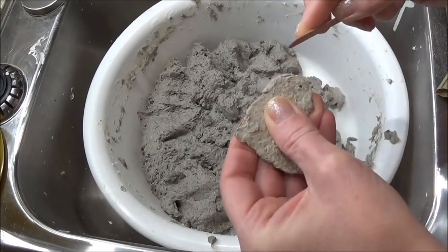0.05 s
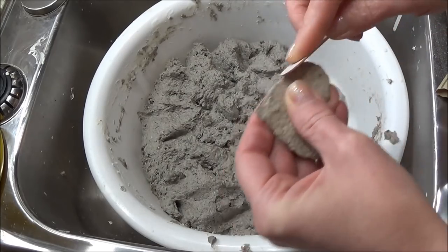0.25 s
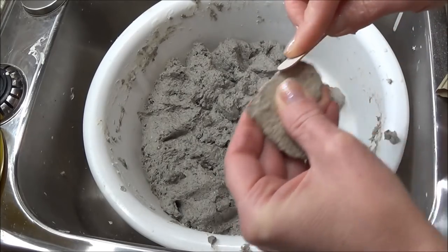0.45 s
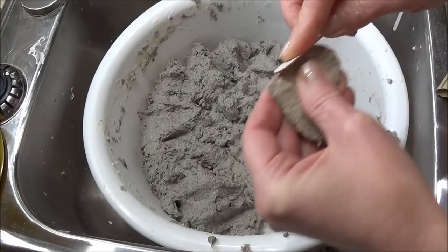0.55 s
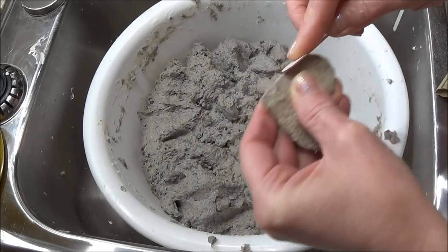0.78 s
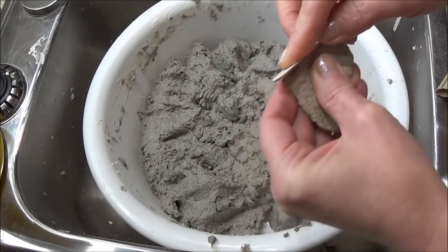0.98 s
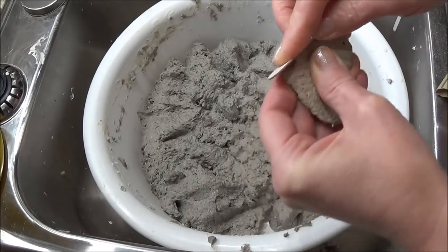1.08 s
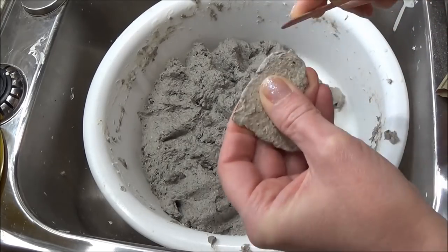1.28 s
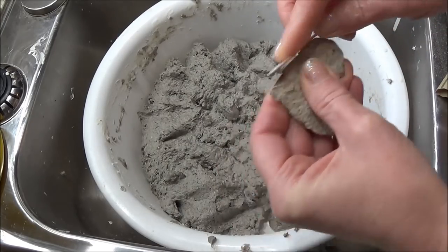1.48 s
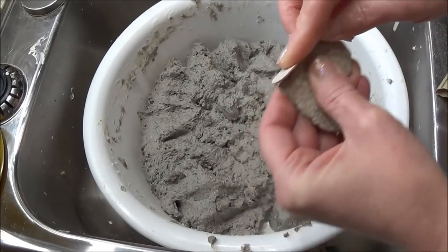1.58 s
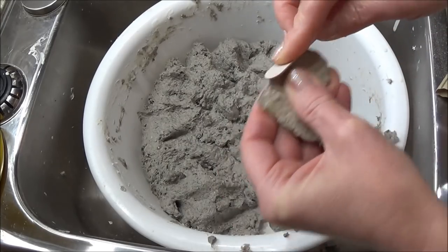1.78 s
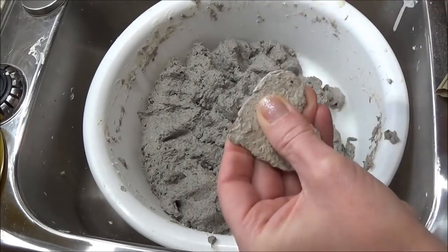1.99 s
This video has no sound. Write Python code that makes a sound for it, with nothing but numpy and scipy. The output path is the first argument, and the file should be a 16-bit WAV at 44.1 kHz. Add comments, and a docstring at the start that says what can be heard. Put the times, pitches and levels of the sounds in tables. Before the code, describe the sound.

An emery board files a lump of dried clay with quick, dry, scratchy strokes. It pauses briefly, then rasps again in a shorter burst. The sound is close, over a kitchen sink, with soft room noise and an appliance hum.

```python
"""Soft room noise and the hum of an appliance are heard from start to end.
Almost at once, an emery board is rubbed quickly to and fro over dried clay for about a second.
Grit catches and breaks thousands of times a second and rings the stiff board; each stroke swells,
then stalls at the turn. The steel sink below and the kitchen answer with brief echoes.
The board slides off, and after a short pause a second, shorter burst ends in one faint stroke."""
import sys
import numpy as np
from scipy import signal
from scipy.fft import rfft, irfft
from scipy.io import wavfile

SR = 44100
rng = np.random.default_rng(int(sys.argv[2]) if len(sys.argv) > 2 else 0)


def put_to_file(sound):
    """Save the sound as 16-bit audio at rate SR, in the file named by the first command-line argument."""
    columns = np.atleast_2d(sound).T  # one column per channel
    safe = np.clip(columns, -1, 1)
    whole_steps = np.round(safe * 32767)
    wavfile.write(sys.argv[1], SR, whole_steps.astype(np.int16))


N = 90404
TIME = np.arange(N) / SR
CUTOFF_HZ = 15750

# The strokes of the board. Each row: start in seconds, seconds up to the crest, seconds from crest to
# stall, crest level in dB, first bite against the crest in dB, brightness in dB, dull rub in dB.
STROKES = [ (.141, 0.028, .027, -32.5, 2.5, -2, 2.5), (0.2, 0.014, 0.031, -28.5, -8, 2, -4.5),
           (.251, 0.024, 0.023, -32, -7, 2, -1), (0.305, 0.02, 0.028, -29, -13, 3.5, -11),
           (.364, 0.027, 0.018, -31.5, -2, 1, 2), (.421, .020, 0.026, -31, -2, 0.5, -5),
           (.475, 0.029, 0.02, -30.5, -8, 4.5, 1.5), (0.532, 0.024, 0.025, -31, -13, 3.5, 0.5),
           (.590, 0.014, 0.031, -32.5, -7, 7, 3), (0.646, .025, 0.023, -30, -16, 2.5, -9),
           (.703, 0.021, 0.021, -32, -10.5, 3.5, 5), (.759, 0.022, 0.019, -31, -8.5, 4, -5.5),
           (0.811, .026, 0.013, -31, -9.5, 2, -1.5), (0.868, 0.022, 0.029, -33.5, -9.5, 4, 2.5),
           (.927, 0.029, 0.017, -31.5, -6, -1, 2.5), (.986, 0.019, 0.027, -32.5, -14, 4.5, -8),
           (1.042, 0.024, 0.018, -31.5, -11.5, 2.5, 1.5), (1.1, 0.021, 0.031, -29.5, -7.5, 4.5, -15),
           (1.46, 0.0089, 0.02, -29, 0.5, -1, 0), (1.514, 0.02, 0.018, -38.5, -10, -2.5, -2),
           (1.563, 0.021, 0.019, -32, -5, 0, 4.5), (1.616, 0.019, 0.03, -30.5, -14, 1, -4.5),
           (1.677, 0.021, 0.022, -32, -10.5, 4, 3), (1.734, .017, 0.028, -30, -10, 2, -2),
           (1.792, 0.023, 0.021, -30.5, -8.5, 2.5, 3.5), (1.848, 0.018, 0.031, -30.5, -2.5, 5.5, -4.5),
           (1.937, 0.012, 0.015, -55.5, -17, -2, 9.5)]
# The hollow tones of bowl and sink. Each row: pitch in Hz, width in Hz, boost in dB (minus is a dip).
HOLLOW_TONES = [(207, 28, 6.5), (315.5, 34, 5), (371.6, 67, 6.5), (672.5, 53, 7), (1250, 104, -5.5)]


def from_db(db):
    """Turns decibels into a number to multiply a sound by."""
    return 10 ** (np.asarray(db) / 20)


def rms_one(x):
    """Scales a sound to an average power of one."""
    return x / np.sqrt(np.mean(x ** 2) + 1e-20)


def passband(x, hz, kind, order=2):
    """Keeps the "low" or the "high" side of a frequency."""
    return signal.sosfilt(signal.butter(order, np.clip(hz, 10, .45 * SR), kind, fs=SR, output="sos"), x)


def colour(x, points, peaks=(), size=8192):
    """Shapes a sound with a tone curve and ringing peaks; white noise keeps about the same power."""
    hz = np.maximum(np.fft.rfftfreq(size, 1 / SR), 1)
    knots, levels = np.transpose(points)
    db = np.interp(np.log(hz), np.log(knots), levels)
    for centre, width, lift in peaks:
        db = db + lift / (1 + (2 * (hz - centre) / width) ** 2)
    gain = from_db(db) / np.sqrt(np.mean(from_db(db) ** 2 * (hz < CUTOFF_HZ)))
    # These steps make the filter ring after each hit, never before it.
    cepstrum = irfft(np.log(gain))
    cepstrum[1:size // 2] *= 2
    cepstrum[size // 2 + 1:] = 0
    ring = irfft(np.exp(rfft(cepstrum)))
    return signal.fftconvolve(x, ring)[:N]


def by_stroke(x, effect):
    """Passes each stroke through the effect on its own, with time to ring out, and joins them."""
    edges = [0] + [int(row[0] * SR) for row in STROKES[1:]] + [N]
    pieces = [(a, effect(np.pad(x[a:b], (0, SR // 16)))) for a, b in zip(edges, edges[1:])]
    joined = np.zeros(pieces[0][1].shape[:-1] + (N + SR,))
    for start, piece in pieces:
        joined[..., start:start + piece.shape[-1]] += piece
    return joined[..., :N]


def background():
    """Soft room noise, wider in the treble, and the steady hum of an appliance."""
    # The tone of the room noise. Each row: frequency in Hz, relative level in dB.
    air_curve = [(25, -6.5), (55, -6.5), (82, -0.5), (150, -6), (270, -6.5), (360, -5), (500, -9),
                 (700, -7), (950, -11), (1280, -6.5), (1500, -13.5), (2600, -14), (4500, -19), (6000, -17),
                 (10000, -23), (16000, -26)]
    # Its stereo width. Each row: frequency in Hz, side (what differs between the ears) against mid in dB.
    air_width = [(60, -41), (110, -33), (200, -37), (380, -33.5), (700, -16), (1290, -7.5), (2400, -4.5),
                 (8000, -4), (15000, -15)]
    # The tones of the hum. Each row: pitch in Hz, average level in dB.
    hum_tones = [(118, -65), (1181, -71.5), (1299, -74.5)]
    air_db = -58.5
    mid, side = [colour(white, air_curve, HOLLOW_TONES) for white in rng.standard_normal((2, N))]
    knots, width_db = np.transpose(air_width)
    side_db = np.interp(np.log(np.fft.rfftfreq(N, 1 / SR) + 1), np.log(knots), width_db)
    side = irfft(rfft(side) * from_db(side_db), N)
    hum = sum(np.sqrt(2) * from_db(db) * np.sin(2 * np.pi * (hz * TIME + rng.random()))
              for hz, db in hum_tones)
    return from_db(air_db) * np.array([mid + side, mid - side]) + hum


def rubbing():
    """Strength, brightness and dull rub over time: each stroke bites, swells, stalls and creeps."""
    # The board slides off the clay. Each row: start in seconds, level in dB, fade in dB per second.
    slides = [(1.139, -41, 340), (1.888, -45, 382)]
    bite_s, swell_curve = 0.0012, 1.6   # the grit takes hold, then the stroke swells
    stall_db, stall_curve = -21.5, 2.96   # the drop at the turn
    creep_db, creep_s = -21, 0.019   # the board still moves a little as it turns
    lump_db, lump_follows = -44, 0.43   # the dull rub swings less than the stroke does
    power, bright, rub = np.full(N, 1e-14), np.zeros(N), np.zeros(N)
    for start, rise, fall, db, bite_db, bright_db, rub_db in STROKES:
        on = slice(int(start * SR), int(start * SR) + SR // 8)
        t = TIME[on] - start - rise   # zero at the crest
        swell = bite_db * np.clip(-t / rise, 0, 1) ** swell_curve
        stall = stall_db * np.clip(t / fall, 0, 10) ** stall_curve
        creep = from_db(creep_db) * np.exp(-((t - fall) / creep_s) ** 2)
        bite = np.clip((t + rise) / bite_s, 0, 1)
        stroke = from_db(db) * np.hypot(from_db(swell + stall), creep) * bite
        power[on] += stroke ** 2
        bright[on] += stroke ** 2 * bright_db
        rub[on] += from_db(lump_db + rub_db) * stroke ** lump_follows
    for start, db, fade in slides:
        power += from_db(db - fade * np.abs(TIME - start)) ** 2 * (TIME >= start)
    return np.sqrt(power), bright / power, rub


def grit():
    """Tiny breaks of uneven size, bunched together by the chatter of the board."""
    grains_per_s, spread_db, size_limit = 22000, 2.5, 3.8
    chatter_db, chatter_hz = 1.15, 300
    sizes = from_db(spread_db * np.minimum(rng.exponential(1, N), size_limit)) * rng.choice([-1, 1], N)
    chatter = rms_one(passband(rng.standard_normal(N), chatter_hz, "low"))
    breaks = rng.random(N) < grains_per_s / SR
    return rms_one(sizes * breaks * from_db(chatter_db * chatter))


def snags():
    """Coarse grains catch and snap in a very short crumble."""
    # The snaps. Each row: start in seconds, relative strength in dB.
    snaps = [(.1417, -31), (.1975, -23), (0.257, -25), (.300, -26), (.3302, -23), (.4765, -28),
             (.5005, -31), (.6075, -24), (.928, -16), (1.054, -13), (1.4605, -24), (1.4638, -31),
             (1.570, -28), (1.679, -25), (1.740, -25), (1.7945, -14)]
    decay_s, trim_db = 0.00023, -5
    crumble = sum(from_db(db + trim_db) * np.exp(-np.abs(TIME - start) / decay_s) * (TIME >= start)
                  for start, db in snaps)
    return crumble * rng.choice([-1, 1], N)


def board(grains):
    """The stiff board rings a little differently at each point where it touches the clay."""
    # The overall tone of the rasp. Each row: frequency in Hz, relative level in dB.
    rasp_curve = [(150, -33), (400, -30), (700, -20.5), (1000, -21.5), (1500, -18), (2050, -12), (2600, -3),
                  (3600, -5), (5000, -8.5), (6200, -8.5), (8000, -5), (9600, -4.5), (11000, 0), (13200, -3),
                  (16000, -2.5)]
    # The ringing tones of the board. Each row: pitch in Hz, width in Hz, boost in dB.
    board_tones = [(2642, 138, 3.5), (3260, 550, 5), (3946, 53, 9), (4375, 260, 5), (5386, 213, 7.5),
                   (6800, 690, 2.5), (7760, 210, 3), (8980, 150, 1.5), (11900, 410, 3), (14580, 320, 7),
                   (15780, 410, 1.5)]
    detune, vary_db = 0.0084, 2.64
    chance = rng.standard_normal((len(board_tones), 2))
    tones = [(hz * (1 + detune * a), width, lift + vary_db * b)
             for (hz, width, lift), (a, b) in zip(board_tones, chance)]
    return colour(grains, rasp_curve, tones, size=2048)


def lump(rub):
    """The hand-held lump of clay turns the grit into a dull, hollow rub."""
    # The tone of the rub. Each row: frequency in Hz, relative level in dB.
    lump_curve = [(100, -32.5), (250, -8.5), (400, -2.5), (700, -0.5), (1100, -4), (2000, -7),
                  (5000, -38.5)]
    return colour(rub * grit(), lump_curve, HOLLOW_TONES)


def filing():
    """Grit and snags ring the board, some strokes brighter than others; the lump adds its rub."""
    grit_db, treble_from_hz = -0.5, 5870
    strength, bright_db, rub = rubbing()
    rasp = by_stroke(from_db(grit_db) * strength * grit() + snags(), board)
    low = passband(rasp, treble_from_hz, "low", order=1)
    treble = rasp - low
    return low * from_db(-bright_db) + treble * from_db(bright_db / 2) + lump(rub)


def echoes(x, fade_s, delay_s, dull_hz):
    """Dense reflections that fall by 60 dB in fade_s; left and right differ mainly in the treble."""
    wide_above_hz = 1430
    t = TIME[TIME < delay_s + fade_s]
    noise = passband(rng.standard_normal((2, SR))[:, :len(t)], dull_hz, "low", order=1)
    tails = noise * from_db(-60 * t / fade_s) * (t > delay_s)
    mid, side = [signal.fftconvolve(x, tail / np.sqrt(2 * np.sum(tail ** 2)))[:N] for tail in tails]
    return mid + passband(side, wide_above_hz, "high") * np.array([[1], [-1]])


def scene():
    """The filing close by, the sink just beneath (its echoes shift as hands move), the kitchen around."""
    sink_db, kitchen_db, pan_db = -11.5, -16.5, 0.43
    direct = filing()
    sink = by_stroke(direct, lambda stroke: echoes(stroke, fade_s=0.024, delay_s=0.00064, dull_hz=17700))
    kitchen = echoes(direct, fade_s=0.2, delay_s=0.005, dull_hz=8700)
    mix = direct + from_db(sink_db) * sink + from_db(kitchen_db) * kitchen
    lean_right = from_db([[-pan_db], [pan_db]])
    return mix * lean_right + background()


def record(dry):
    """Cuts off the very highest treble steeply."""
    return signal.sosfilt(signal.ellip(12, .2, 75, CUTOFF_HZ, fs=SR, output="sos"), dry)


dry = scene()
out = record(dry)
put_to_file(out)
```